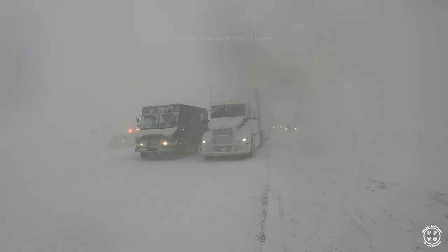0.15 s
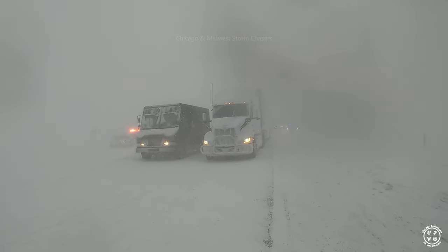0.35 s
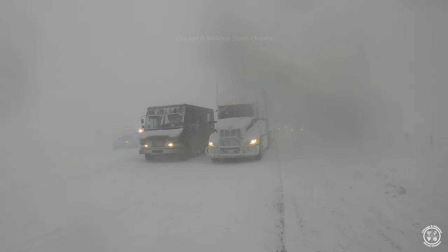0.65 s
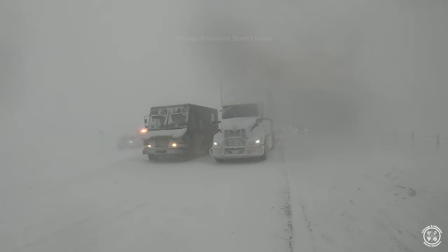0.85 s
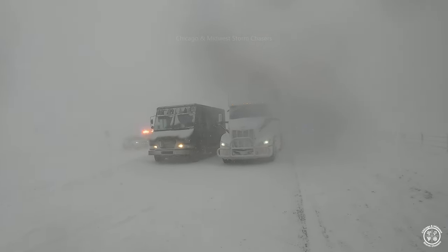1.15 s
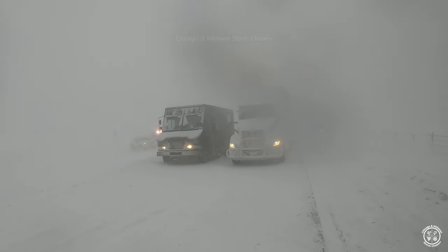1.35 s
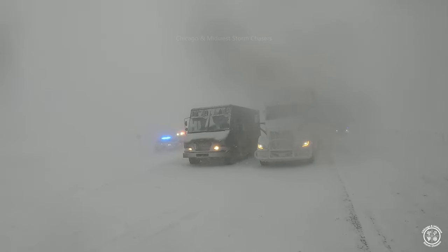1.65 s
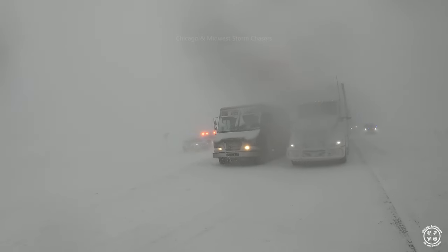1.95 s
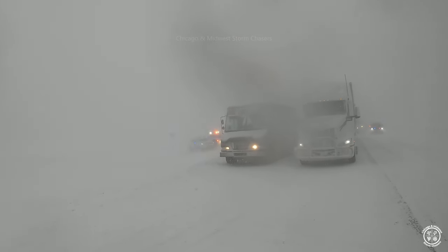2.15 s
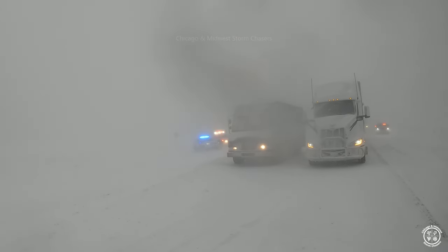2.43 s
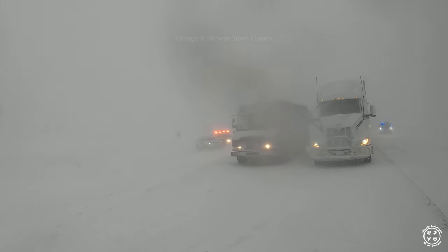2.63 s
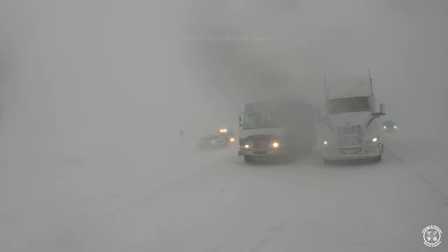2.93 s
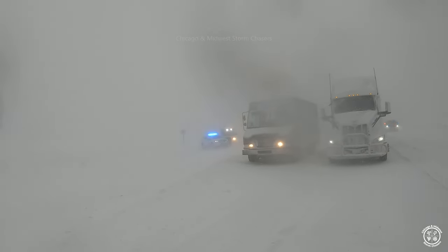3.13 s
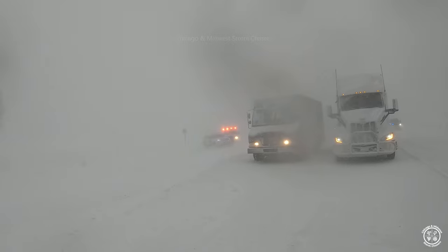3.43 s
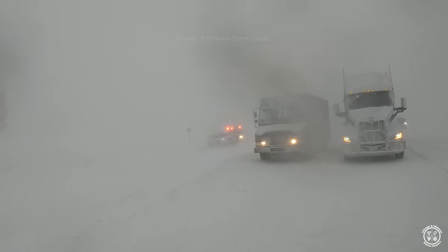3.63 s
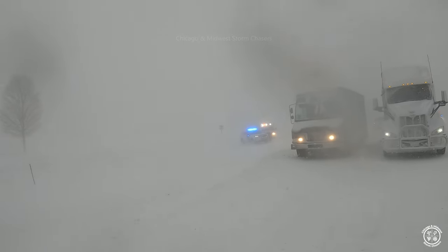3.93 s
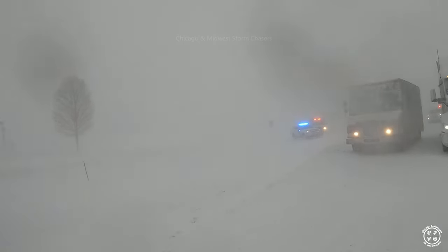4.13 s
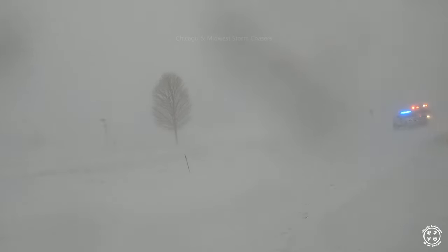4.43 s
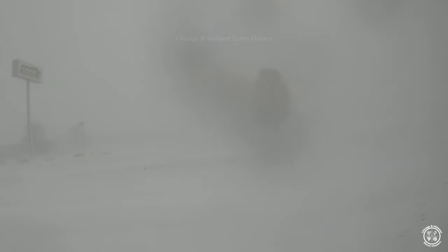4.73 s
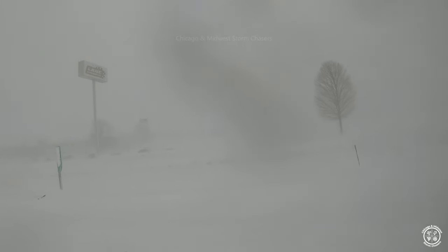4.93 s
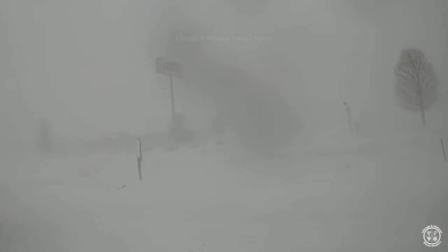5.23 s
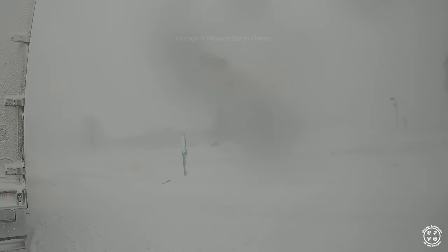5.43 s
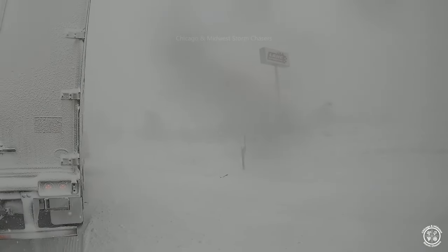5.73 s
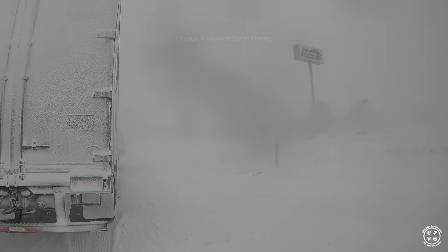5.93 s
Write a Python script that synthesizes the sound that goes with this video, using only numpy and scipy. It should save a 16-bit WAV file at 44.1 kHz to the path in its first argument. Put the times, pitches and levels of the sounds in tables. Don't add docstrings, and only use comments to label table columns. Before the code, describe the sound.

A handheld microphone outdoors in a blizzard, wind hitting it directly throughout. A loud, deep, uneven rumble runs from 0 to 6 seconds without a pause, its strongest pushes slightly squashed. From 0 to 0.5 s bright, fluttering gusts come quickly, with two short dull knocks near 0.1 s. Flaps and rounded thumps continue to about 2.2 s, with a strong ragged burst around 1.6 s and another near 2.1 s. From 2.2 to 4 s the buffeting is heavier and duller, with tiny bright metal rattles, clustered around 2.75 s. A low hollow knock lands at 4.0 s; a fainter one rings at 4.6 s. Between 4.4 and 5.5 s separate puffs thump over slightly stronger snow hiss. A small knock at 5.75 s precedes a sharp bright gust near 5.87 s. Behind everything are distant airy roar and a nearly hidden, rapid diesel tick, clearest around 2.5-3.5 and 4.5-4.9 s.

```python
import sys
import numpy as np
from scipy import signal
from scipy.fft import rfft, irfft, next_fast_len
from scipy.io import wavfile
from scipy.ndimage import uniform_filter1d, minimum_filter1d, map_coordinates

SR = 44100
rng = np.random.default_rng(int(sys.argv[2]) if len(sys.argv) > 2 else 0)


def master_out(mix):
    frames = np.transpose(np.atleast_2d(mix))
    ceiling = np.clip(frames, -1, 1)
    pcm = np.round(ceiling * 32767).astype(np.int16)
    wavfile.write(sys.argv[1], SR, pcm)


def amplitude_ratio(level_db):
    exponent = np.asarray(level_db, float) / 20
    return 10 ** exponent


N = 268083

# time in seconds, strength in dB.
WIND_STRENGTH = [(0.02, -28), (0.15, -31), (0.66, -35), (0.91, -32), (1.11, -27), (1.5, -29), (1.92, -25),
                 (2.49, -29), (2.99, -25), (3.28, -27.5), (3.68, -26), (4.17, -34), (4.44, -34),
                 (4.67, -31), (5.12, -33), (5.43, -28), (5.76, -28), (6.05, -33)]
# centre in seconds, half length in seconds, push in dB, brightness in dB.
BUFFETS = [(.04, 0.062, 6, 11), (.17, 0.056, 4, 6), (.42, 0.023, 11, 13.5), (.483, .035, 10.5, 11),
           (.79, 0.01504, 3, 3), (2.57, 0.03025, 3, 0), (2.8, 0.01195, 0, 4), (2.93, 0.02996, 0, 3),
           (0.626, 0.026, 9, 2), (.7, 0.025, 9, 2), (0.928, 0.054, 5, 1), (1.029, 0.054, 3, 5),
           (1.119, 0.05, 2.5, 4.5), (1.28, 0.054, 3, 3), (1.6, 0.031, 8.5, 4.5), (1.695, 0.043, 5, 10),
           (1.959, 0.047, 5, 6), (2.08, 0.039, 4.5, 11), (2.26, 0.043, 2.5, 7), (2.48, 0.058, 5, 1),
           (2.763, 0.064, 5, 4), (2.915, 0.069, 3.5, 6.5), (3.14, .1, 3.5, 3.5), (3.345, 0.023, 2, 5),
           (3.54, 0.064, 5, 5.5), (4.83, .13, 0.5, 4), (4.401, 0.021, 9, 0), (4.59, 0.082, 0.5, 7.5),
           (4.812, 0.023, 10, -2), (4.913, 0.034, 7.5, 0.5), (2.19, 0.042, 2, 1.5), (5.425, 0.036, 9, -4),
           (5.712, 0.036, 5.5, 0.5), (.35, 0.01196, 2, 4), (.76, 0.029, -6, 0), (1.652, 0.019, 3, 4),
           (2.31, 0.024, -4, 0), (3.0, 0.031, -4, -2), (3.25, 0.03, -3.5, 0), (3.7, 0.03, -3, -4),
           (3.82, 0.055, 4, 2), (3.95, 0.028, 4, -4), (4.2, 0.03, 3, 0), (4.3, 0.051, 2, 4),
           (5.24, 0.059, 0.2, 3.5), (5.5, 0.036, -0.4, 4), (5.97, 0.046, 3.5, 3), (5.869, .023, 11.5, 12),
           (5.906, .01, 3, 2), (5.647, .012, 0.5, 5), (3.47, .02, 0, 4), (.88, 0.015, 0, 4)]
# time in seconds, level in dB.
HEAVE = [(0.02, -23.5), (2.1, -18.5), (2.17, -26.5), (2.2, -22), (4.67, -23.5), (4.72, -30), (4.75, -21.5),
         (4.94, -29.5), (4.97, -31), (5.06, -23.5), (5.64, -21.5), (6.05, -19)]
# centre in seconds, half length in seconds, change in dB.
SURGES = [(.12, .05, -2), (.5, 0.078, -2), (.75, 0.051, 1), (1.1, 0.022, 3.5), (1.6, 0.033, 0),
          (1.85, 0.036, 2.5), (2.45, 0.024, -0.5), (2.51, .025, -3), (2.7, 0.036, 2), (2.95, .03, -1),
          (3.22, 0.045, 0.5), (3.4, 0.033, -1), (3.55, 0.03, -1), (3.7, 0.03, -3.5), (3.81, 0.051, -1),
          (4.0, 0.035, -1), (4.35, 0.033, -4), (4.41, 0.021, 1), (4.88, 0.049, -2.5), (5.1, 0.03, -2),
          (5.45, .035, -2), (5.99, 0.031, -3)]
# centre in seconds, half length in seconds, change of the large
# eddies in dB, of the small in dB, of the finest in dB.
EDDY_SWELLS = [(0.13, 0.015, 2, 6, 2), (0.17, 0.02, -1.5, -7, 2.5), (0.319, 0.035, 3.5, -13, -1),
               (0.738, 0.022, -3, -9, -3), (0.838, 0.022, 0.5, -6, -1.5), (0.918, 0.066, 2, 2, 4),
               (1.058, 0.021, -6.5, -8.5, 4.5), (1.197, 0.033, -4, 0.5, -3), (1.387, 0.057, -1, 4, -0.5),
               (1.467, 0.017, -1, -9, -4), (1.527, 0.046, -0.5, 0.5, 1), (1.626, 0.035, -3.5, -6.5, -5),
               (1.736, 0.019, 2.5, -4, -1.5), (1.876, 0.072, -9.5, 0, -1), (2.424, 0.095, 0.5, 0, -5),
               (2.674, 0.1, 0.5, -1, -3), (2.764, 0.021, 0, -2.5, -2.5), (2.873, 0.013, -1.5, 3, 4),
               (3.033, 0.044, -2, 4.5, 0.5), (3.542, 0.02, 0.5, -6.5, 1.5), (3.662, 0.1, 3, 2.5, -4.5),
               (3.722, 0.018, 1, -1, 4), (3.791, 0.02, 1, -4, -3), (3.921, 0.1, 2, -1, -3),
               (4.041, 0.02, 0, 6.5, 2.5), (4.111, 0.07, -1, -4, -0.5), (4.18, 0.0082, -2, 0, 0),
               (4.54, 0.066, -1, 2.5, 2), (4.699, 0.02, -0.5, 5, 0), (4.759, 0.026, 0, 5, 4),
               (4.839, 0.036, 10, -8, 3), (4.909, 0.021, 14, -4, 1.5), (5.148, 0.027, 2.5, -6, 2),
               (5.228, 0.037, 1.5, 4, 0), (5.348, 0.03, -4, 2, -3), (5.488, 0.033, 2.5, 0.5, -3),
               (5.567, 0.02, 0, 6.5, -5), (5.927, 0.03, -3, 3.5, 2), (5.986, 0.02, 4, 1, 1),
               (6.036, 0.025, -5.5, -6, -3.5)]
# start in seconds, jump in dB.
FLAPS = [(.022, 8), (.058, 6), (0.087, 6), (0.174, 6), (.212, 6), (0.345, 10), (0.414, 9), (0.466, 8),
         (0.985, 5), (1.091, 5), (1.241, 9), (1.299, 6), (1.328, 9), (1.585, 8), (1.644, 9), (1.679, 7),
         (1.729, 10), (1.759, 9), (1.833, 9), (1.99, 5), (2.034, 6), (2.062, 7), (2.101, 6), (2.343, 7.5),
         (2.445, 5), (2.638, 8), (2.702, 9), (2.741, 8), (3.126, 7), (3.346, 7), (4.539, 10), (4.593, 6),
         (4.655, 6), (4.777, 5), (5.855, 4.5)]
# frequency in Hz, density in dB per Hz.
LARGE_SPECTRUM = [(5, -10.5), (14, 5.5), (30, 0), (70, 0), (120, -5), (170, -12.5), (300, -24.5),
                  (700, -60.5), (1500, -120)]
# frequency in Hz, density in dB per Hz.
SMALL_SPECTRUM = [(20, -23.5), (90, -2), (200, 1), (350, -5.5), (600, -13.5), (1100, -34.5), (2000, -53.5),
                  (4000, -66.5), (9000, -100)]
# frequency in Hz, density in dB per Hz.
FINE_SPECTRUM = [(300, -33), (700, 3), (1000, 5), (1400, 0.5), (1900, -6), (2800, -17), (4000, -35),
                 (8000, -71)]
# centre in seconds,
# peak in dB, pitch in Hz.
WHORLS = [(0.027, -23, 1050), (0.071, -15.5, 463), (0.094, -29, 1450), (0.157, -31, 1720),
          (0.175, -30, 1460), (0.214, -23.5, 1460), (0.301, -30, 1460), (0.414, -22, 890),
          (0.426, -30, 1460), (0.466, -25, 890), (0.478, -21, 750), (0.496, -20, 635), (0.666, -27, 460),
          (0.701, -22.5, 240), (1.031, -18.5, 390), (1.157, -22, 330), (1.33, -25, 639), (1.584, -13, 460),
          (1.601, -15, 540), (1.693, -18, 1040), (1.73, -19, 749.6), (1.76, -21, 644), (1.945, -21, 540),
          (1.991, -26, 889.6), (2.074, -27, 1240), (2.085, -30, 1237), (2.124, -14.5, 460),
          (2.221, -34, 1460), (2.257, -25.5, 1050), (2.642, -27, 889), (2.748, -25, 638.7),
          (2.915, -28.5, 1720), (3.102, -19.5, 460), (3.354, -24.5, 891.2), (3.505, -17, 329.2),
          (3.567, -35, 2034), (3.985, -26, 888.4), (4.27, -27, 388), (4.398, -23.5, 240),
          (4.459, -26, 1459), (4.542, -22, 642.4), (4.598, -24, 1048), (4.632, -28.5, 2016),
          (4.659, -32, 1720), (4.792, -25, 1239), (4.814, -13.5, 389.6), (4.913, -21, 281.3),
          (5.227, -26, 1461), (5.267, -30, 1051), (5.408, -14.5, 329.4), (5.437, -22, 389.6),
          (5.449, -18, 384.8), (5.507, -27, 1237), (5.647, -28, 1720), (5.697, -25, 542.6),
          (5.738, -30.5, 2029), (5.767, -29, 1050), (5.857, -16, 641), (5.875, -17, 890),
          (5.906, -21, 540.5),
          (0.13, -19, 250), (0.409, -18, 300), (0.43, -21, 300), (0.478, -22, 350), (0.504, -21.5, 352),
         (0.626, -19.5, 212), (0.92, -22, 303), (0.974, -18, 250), (0.998, -20, 300), (1.091, -25, 350),
         (1.273, -21, 300), (1.326, -22, 350), (1.344, -21.5, 300), (1.434, -23, 350),
         (1.614, -16.5, 350.3), (1.682, -20, 349.6), (1.761, -19.5, 350), (1.93, -18, 210),
         (2.102, -15, 300.5), (2.209, -17, 250.4), (2.458, -22, 300), (2.527, -20, 350.8),
         (2.71, -19, 347.8), (2.892, -16.5, 250), (2.968, -14, 150.1), (3.086, -21, 349.7),
         (3.123, -14.5, 249.9), (3.299, -18, 250), (3.325, -17, 299.7), (3.359, -15, 130.1),
         (3.568, -15.5, 179.8), (3.591, -15.5, 250.9), (3.636, -18.5, 300.1), (3.814, -20, 300),
         (3.835, -21.5, 300.4), (3.929, -18.5, 210.2), (4.03, -27, 350), (4.504, -24, 350),
         (4.89, -22, 250.2), (5.692, -20, 299.7), (5.731, -19, 300.5), (5.854, -14, 350), (5.893, -19, 350),
         (5.959, -21, 300),
          (.348, -29, 780), (1.242, -29, 900), (1.645, -26, 800), (1.71, -25, 600), (2.092, -21, 720),
          (2.145, -21, 560), (2.165, -22, 400), (2.8, -30, 1000), (3.548, -29, 1300), (3.585, -28, 1050),
          (4.04, -31, 1200), (4.06, -29, 560), (5.422, -17, 280), (5.43, -25, 650), (5.862, -12, 200),
          (5.92, -22, 200)]
# start in seconds, peak in dB, ring in Hz, noisy edge in dB,
# decay by 60 dB in seconds.
RATTLES = [(2.19, -41, 5348, -32, 0.02), (2.378, -45, 4950, -35, 0.037), (2.508, -45, 5000, -36, .045),
           (2.731, -36, 4930, -36, 0.022), (2.731, -36, 3400, -34, 0.029), (2.754, -34.5, 4700, -23, 0.016),
           (2.7535, -43, 5800, -32, .01), (2.546, -45, 4950, -32, .025), (2.61, -47, 5000, -30, .02),
           (2.365, -48, 5000, -35, .03), (2.758, -46, 6500, -42, .03), (2.7645, -50, 6700, -18, .016),
           (2.7734, -34, 4858, -30, 0.014), (3.248, -45.5, 5000, -21, 0.015),
           (4.295, -38, 5000, -35, 0.029), (4.792, -52, 5720, -16, 0.038), (5.372, -44, 4505, -26, .02)]
# start in seconds, peak in dB, ring in Hz, decay by 60 dB in seconds.
KNOCKS = [
    (.091, -17, 1190, 0.025),
    (0.153, -22.5, 1535, 0.03),
    (3.974, -18.5, 804, 0.054),
    (3.981, -26, 1840, 0.025),
    (3.976, -31, 1300, 0.028),
    (3.978, -33, 2500, .025),
    (4.2, -32, 1896, 0.041),
    (4.622, -29.5, 1723, 0.061),
    (4.622, -31, 1721, .06),
    (5.765, -27, 984, 0.037),
]
# time in seconds, tick level in dB.
DIESEL_LEVEL = [
    (0, -81),
    (2, -80.5),
    (2.5, -75.5),
    (3.4, -74.5),
    (4, -79.5),
    (4.55, -74.5),
    (4.85, -76),
    (5.1, -82.5),
    (6.08, -95),
]
CYLINDERS = [-1.8, 0.94, 0, 0, 0, 0.83]
# frequency in Hz, width in Hz, level in dB.
BLOCK = [
    (3400, 1400, -3),
    (5000, 1000, 3),
    (6500, 680, -1.5),
    (9100, 2100, -11.5),
]
# time in seconds, load in dB.
SNOW_DRIFT = [(0.06, -48.5), (0.42, -50.5), (0.7, -51), (0.97, -52), (1.1, -50.5), (3.75, -52.5),
              (4.67, -44), (4.97, -45), (5.35, -43.5), (5.83, -48.5), (6.0, -49.5)]
# centre in seconds, half length in seconds, added load in dB.
SNOW_SHEETS = [(.055, 0.035, 0.2), (.16, .012, 2.5), (.213, .01, 1.5), (.265, .01, 4), (.302, .01, 3.5),
               (.49, 0.11, 2.5), (.56, .04, 2.5), (1.12, .05, 3.5), (1.592, 0.024, 6.5), (1.652, .012, 4.5),
               (1.7, 0.04, 4.5), (2.076, 0.029, 6), (2.14, .04, 0.5), (2.91, 0.055, 0), (3.15, .03, -0.5),
               (3.555, 0.05, 7), (3.47, .02, 1.5), (3.87, 0.033, 3), (3.99, 0.023, 4.5), (4.05, .045, 3),
               (4.42, 0.04, 2), (4.545, .012, 0), (4.63, 0.032, 3.5), (4.76, .04, 0.5), (4.96, .03, 1),
               (5.23, 0.045, 1.5), (5.5, .04, 0.5), (5.65, .015, 2)]
# frequency in Hz, density in dB per Hz.
HISS_SPECTRUM = [(300, -38.5), (900, -3), (2000, 0), (3350, -3.5), (4050, -10.5), (5000, -17),
                 (5500, -18.5), (6700, -22), (7500, -26), (9600, -34), (10500, -43), (12300, -57.5),
                 (16000, -71.5)]
# frequency in Hz, density in dB per Hz.
PLAIN_SPECTRUM = [(120, -32), (250, -15), (400, 0.5), (650, 1.5), (1000, -3), (1600, -14.5), (3000, -52)]


def wind():
    wind_db, = curves(WIND_STRENGTH)
    heave_db, = curves(HEAVE)
    surge_db, = packets(SURGES)
    push_db, shine_db = packets(BUFFETS)
    large_swell_db, small_swell_db, fine_swell_db = packets(EDDY_SWELLS)
    snow_db, lift_db = snow_load(), flaps()
    puff, flutter = wobble(45), wobble(120)

    large_db = heave_db + surge_db + 0.17 * push_db + 1.1 * wobble(9.2) + 0.69 * large_swell_db + 3.0
    large = evened(rush(LARGE_SPECTRUM, patchy_db=1.25), seconds=0.049, share=0.92)

    gust_db = wind_db + push_db + 1.084 * wobble(16)
    speed_db = 0.12 * (gust_db + 30) + 0.25 * (shine_db - 6.5) + 0.7 * puff + 0.3 * lift_db
    speed = np.clip(amplitude_ratio(speed_db), 0.4, 3)
    pattern = rush(SMALL_SPECTRUM, patchy_db=0.5, size=3 * N)
    small = map_coordinates(pattern, [np.cumsum(speed)])
    small = evened(amplitude_ratio(0.52 * puff + 0.9 * flutter + 0.64 * lift_db) * small, seconds=0.03, share=0.58)
    small_db = gust_db + 0.77 * small_swell_db + 0.11 * lift_db - 0.63

    fine_db = 1.32 * (snow_db - snow_db.mean()) + 0.17 * (wind_db - wind_db.mean()) - 49.5
    fine_db = fine_db + shine_db + 0.77 * wobble(18) + fine_swell_db + 0.42 * lift_db
    fine_flutter_db = 0.45 * puff + 2.1 * flutter + 1.8 * wobble(70) + 0.63 * lift_db
    fine = amplitude_ratio(fine_flutter_db) * rush(FINE_SPECTRUM, patchy_db=2.0)
    fine = evened(fine, seconds=0.037, share=0.85)
    crest = filtered(fine, lambda hz: 1 / (1 + (1720 / (hz + 1)) ** 4))
    fine = fine + amplitude_ratio(-14 + 0.36 * shine_db) * crest

    return amplitude_ratio(large_db) * large + amplitude_ratio(small_db) * small + amplitude_ratio(fine_db) * fine


def flaps():
    sinking_s, lead_s = 0.012, 0.01
    t = np.arange(N) / SR
    lift_db = np.zeros(N)
    for s, jump_db in FLAPS:
        first = round((s - lead_s) * SR)
        u = (t[first:][:SR // 10] - s) / sinking_s
        lull = -0.3 * np.exp(2.545 * np.minimum(u, 0))
        jump = (1 - np.exp(-8 * np.abs(u))) * np.exp(-u)
        lift_db[first:][:len(u)] += jump_db * np.where(u > 0, jump, lull)
    return uniform_filter1d(uniform_filter1d(lift_db, size=70), size=70)


def whorls():
    half_turns, sag = 1.3, 0.06
    eddies = WHORLS
    out = np.zeros(N + SR)
    t = np.arange(-SR // 50, SR // 50) / SR
    starts = rng.uniform(0, 2 * np.pi, len(eddies))
    for (s, db, hz), start in zip(eddies, starts):
        turns = hz * t
        shape = np.exp(-(np.where(turns < 0, 1.4 * turns, turns) / half_turns) ** 2)
        wave = np.sin(start + 2 * np.pi * turns * (1 - sag * turns / 2))
        out[round(s * SR):][:len(t)] += amplitude_ratio(db - 1) * shape * wave
    return out[SR // 50:][:N]


def loose_parts():
    out = np.zeros(N + SR)
    t = np.arange(SR // 10) / SR
    edge = modes([(4800, 900, 3.0), (6500, 1000, -1), (9300, 1300, -8.0)])
    for s, db, hz, edge_db, t60 in RATTLES:
        noise = filtered(rng.standard_normal(len(t)), edge)
        ring = np.sin(2 * np.pi * hz * t) + amplitude_ratio(edge_db + 33.5) * noise
        out[round(s * SR):][:len(t)] += amplitude_ratio(db - 4.0 - 60 * t / t60) * ring * (1 - np.exp(-t / 0.0018))
    for s, db, hz, t60 in KNOCKS:
        ring = np.sin(2 * np.pi * hz * t)
        out[round(s * SR):][:len(t)] += amplitude_ratio(db - 4.0 - 60 * t / t60) * ring * (1 - np.exp(-t / 0.0017))
    return filtered(out[:N], lambda hz: 1 / (1 + (hz / 10500) ** 12))


def diesel():
    firing_hz, firing_s = 32.545, 3.6861
    tick_db, = curves(DIESEL_LEVEL)
    turns = (np.arange(N) / SR - firing_s) * firing_hz + 600
    firing = turns.astype(int)
    since = (turns - firing) / firing_hz
    strength_db = np.tile(CYLINDERS, 200)[firing] + 0.99 * rng.standard_normal(1200)[firing]
    click, clatter = amplitude_ratio(-60 * since / 0.0038), amplitude_ratio(-60 * since / 0.31)
    burst = amplitude_ratio(strength_db) * (click + 0.7 * clatter)
    block = modes(BLOCK)
    ticks = filtered(burst * rng.standard_normal(N), lambda hz: block(hz) / (1 + (hz / 10300) ** 12))
    return amplitude_ratio(tick_db + 13.5) * unit(ticks)


def storm():
    load_db = snow_load()
    swing_db = 0.8 * (load_db - load_db.mean())
    hiss_db = swing_db - 48.0 + 0.49 * wobble(33)
    roar_db = 0.8 * packets(EDDY_SWELLS)[2] + 0.25 * flaps() + 0.5 * (swing_db + 0.5) + 0.35 * wobble(24) - 41.0
    hiss = amplitude_ratio(hiss_db) * rush(HISS_SPECTRUM, patchy_db=1.4)
    return hiss + amplitude_ratio(roar_db) * rush(PLAIN_SPECTRUM, patchy_db=3.0)


def snow_load():
    return curves(SNOW_DRIFT)[0] + packets(SNOW_SHEETS)[0]


def packets(rows):
    steepness, tail = 2.5, 1.2
    s, half, *cols = np.transpose(rows)[:, :, None]
    t = np.arange(0, N / SR + .002, .001)
    u = (t - s) / half
    shape = np.exp(-np.abs(np.where(u > 0, u / tail, u)) ** steepness)
    return curves(np.transpose([t] + [(c * shape).sum(axis=0) for c in cols]))


def curves(rows):
    s, *cols = np.transpose(rows)
    return [np.interp(np.arange(N) / SR, s, c) for c in cols]


def wobble(rate):
    knots = rng.standard_normal(int(N * rate / SR) + 4)
    return map_coordinates(knots, [np.arange(N) * rate / SR])


def rush(spectrum, patchy_db, size=N):
    z = signal.stft(rng.standard_normal(size + 512), nperseg=512)[2]
    field = uniform_filter1d(rng.standard_normal(z.shape), size=5, axis=0)
    field = uniform_filter1d(field, size=8, axis=1)
    x = signal.istft(z * amplitude_ratio(patchy_db * unit(field)), nperseg=512)[1][:size]
    f, db = np.transpose(spectrum)
    return unit(filtered(x, lambda hz: amplitude_ratio(np.interp(np.log(hz + 1), np.log(f + 1), db))))


def evened(x, seconds, share):
    size = round(seconds * SR)
    power = np.abs(uniform_filter1d(uniform_filter1d(x ** 2, size), size))
    return unit(x / (power + 1e-9) ** (np.clip(share, 0, 1) / 2))


def modes(table):
    def response(f):
        total = 0
        for k, (centre, width, db) in enumerate(table):
            damping = 1j * f * width
            total = total + (-1) ** k * amplitude_ratio(db) * damping / (centre ** 2 - f ** 2 + damping)
        return total
    return response


def filtered(x, response):
    m = next_fast_len(len(x) + SR // 4)
    return irfft(rfft(x, m) * response(np.fft.rfftfreq(m, 1 / SR)), m)[:len(x)]


def unit(x):
    return x / np.sqrt(np.mean(x ** 2) + 1e-20)


def scene():
    return (wind() + whorls() + loose_parts() + diesel() + storm())[None]


def band_limit(x):
    return signal.sosfilt(signal.butter(12, 15700, fs=SR, output="sos"), x)


def record(dry):
    padded = np.pad(dry[0], 400, "reflect")
    heard = filtered(padded, lambda hz: 1 / (1 + (hz / 12100) ** 30))[None, 400:-400]
    heard = heard + amplitude_ratio(-102 + 5 * wobble(20)) * rng.standard_normal(N)
    need = np.minimum(1, 0.455 / (np.abs(heard) + 1e-9))
    gain = uniform_filter1d(minimum_filter1d(need, size=901, axis=1), size=900, axis=1)
    return band_limit(heard * gain + 0.0035)


dry = scene()
out = record(dry)
master_out(out)
```